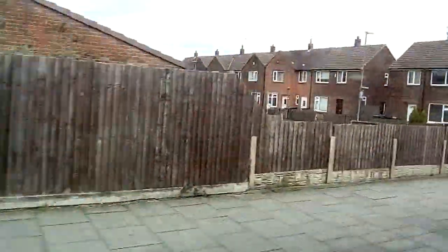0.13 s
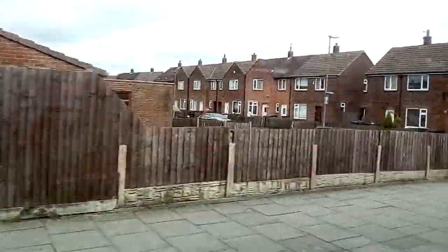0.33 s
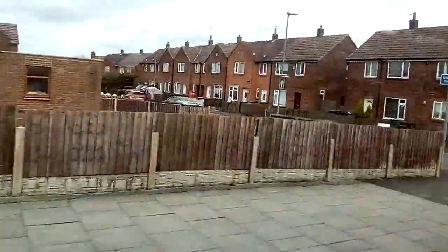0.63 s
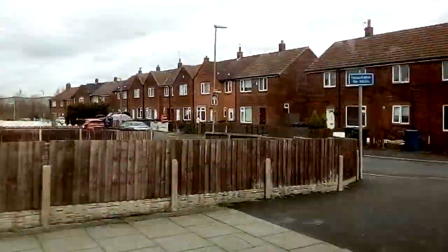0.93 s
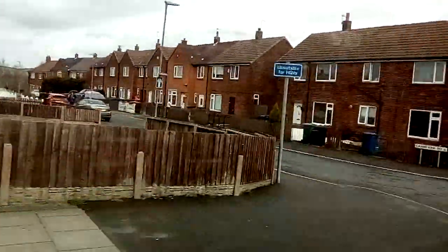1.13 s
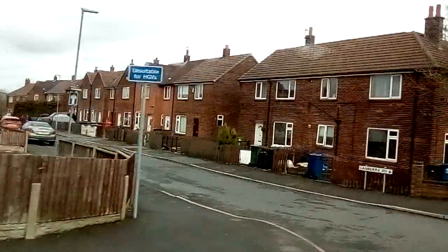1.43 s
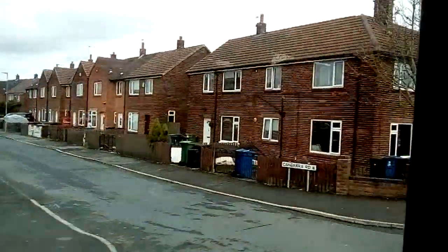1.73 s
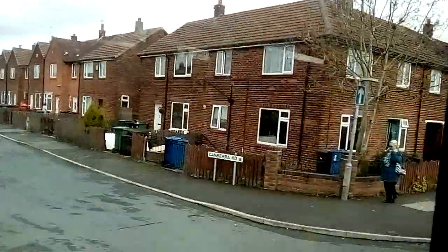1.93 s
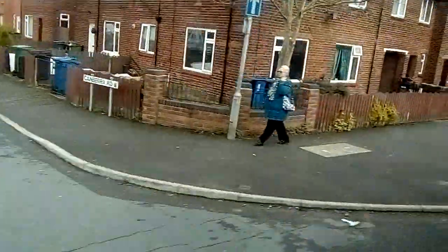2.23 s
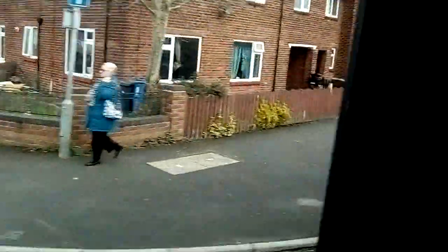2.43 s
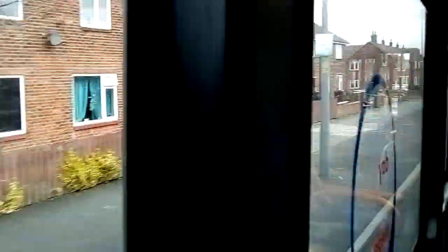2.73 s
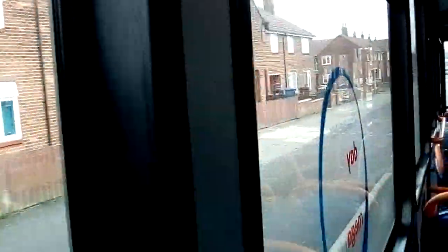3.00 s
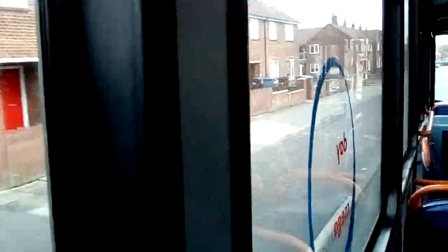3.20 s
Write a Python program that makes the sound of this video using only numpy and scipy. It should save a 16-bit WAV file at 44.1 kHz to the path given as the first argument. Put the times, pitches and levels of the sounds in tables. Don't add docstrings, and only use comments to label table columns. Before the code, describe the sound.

Bus engine drones low and booming inside the cabin while loose panels rattle over bumps

```python
import sys
import numpy as np
from scipy import signal
from scipy.fft import rfft, irfft, next_fast_len
from scipy.io import wavfile
from scipy.ndimage import uniform_filter1d

SR = 44100
rng = np.random.default_rng(int(sys.argv[2]) if len(sys.argv) > 2 else 0)


def boost(x):
    u = np.asarray(x, float) / 20
    return 10 ** u


def materialize(psi):
    bounded = np.clip(np.atleast_2d(psi).T, -1, 1)
    quanta = np.round(bounded * 32767).astype(np.int16)
    wavfile.write(sys.argv[1], SR, quanta)


N = 148176

# frequency in Hz, lead of the left port in radians.
PORT_LEAD = [(0, 0), (250, .3), (430, .6), (1120, 3.2), (2070, 7.0), (3620, 12.9), (5940, 22.6)]


def evened(x):
    return x / np.sqrt(np.mean(x ** 2) + 1e-20)


def read(points, hz):
    f, value = np.transpose(points)
    return np.interp(np.log(hz + 1), np.log(f + 1), value)


def colour(x, db_of):
    size = next_fast_len(N + 4096)
    gain = boost(db_of(np.fft.rfftfreq(size, 1 / SR)))
    return irfft(rfft(x, size) * gain, size)[..., :N]


def wander(rate_hz):
    return evened(colour(rng.standard_normal(N), lambda f: -40 * np.log10(1 + (f / rate_hz) ** 2)))


def resonate(x, hz, width_hz):
    turn = np.exp(2j * np.pi * np.cumsum(hz * np.ones(N)) / SR)
    r = np.exp(-np.pi * width_hz / SR)
    return 2 * (turn * signal.lfilter([1 - r], [1, -r], x / turn)).real


def engine():
    # time in seconds, sixth order in Hz, cabin boom in dB.
    boom = [(0.0, 256, -11.5), (0.069, 254.5, -17.5), (0.371, 251.5, -16.5), (0.471, 248.5, -23),
            (0.571, 254, -18), (0.772, 252.6, -21), (0.93, 252.5, -20), (1.199, 251.5, -19),
            (1.5, 250, -20), (1.702, 249, -25), (1.949, 248.5, -23), (2.198, 248, -24.5), (2.5, 247, -25.5),
            (2.75, 247, -28.5), (3.0, 245.6, -24.5), (3.15, 244, -25), (3.25, 242, -24), (3.36, 243, -25.5)]
    # time in seconds, level in dB.
    throb = [(0.0, -9), (0.07, -23), (0.5, -17.5), (0.55, -29.5), (0.76, -20), (0.95, -37.5), (1.0, -23),
             (1.28, -31.5), (1.33, -19.5), (1.41, -26), (2.98, -17.5), (3.13, -26), (3.18, -15.5),
             (3.36, -22)]
    # time in seconds, level in dB.
    shudder = [(0.0, -28.5), (0.27, -28), (0.39, -55.5), (0.47, -28.5), (0.94, -31.5), (0.97, -21),
               (1.1, -34), (1.19, -17.5), (1.23, -28.5), (1.82, -30), (1.93, -32), (2.2, -25), (2.3, -29),
               (2.52, -27), (3.03, -32.5), (3.36, -34.5)]
    # engine order, level in dB, share of the boom it follows.
    orders = [(1, -32, -.6), (2, -36, 0.1), (5, -42, .2), (8, -39, .6), (9, -45, -.3), (12, -45, .2)]
    throb_gain_db, shudder_gain_db = -2, 2.5
    waver_db, waver_hz, speed_drift = 1.5, 7.2, 0.00601

    s, hz, db = np.transpose(boom)
    t = np.arange(N) / SR
    swell_db = np.interp(t, s, db) - np.mean(db)
    throb_db = throb_gain_db + np.interp(t, *np.transpose(throb))
    shudder_db = shudder_gain_db + np.interp(t, *np.transpose(shudder))
    turns = np.cumsum(np.interp(t, s, hz) / 6 * (1 + speed_drift * wander(6))) / SR
    layers = [(6, np.mean(db), 1), (3, throb_db, 0), (4, shudder_db, 0), *orders]
    out = np.zeros((2, N))
    for order, level_db, share in layers:
        lead = np.interp(order * np.mean(hz) / 6, *np.transpose(PORT_LEAD)) * np.array([[.5], [-.5]])
        size = boost(level_db + share * swell_db + waver_db * wander(waver_hz))
        out += np.sqrt(2) * size * np.sin(2 * np.pi * (round(order) * turns + rng.random()) + lead)
    return out


def rattles():
    # start in seconds, strength in dB, chatter length in seconds, thud against crack in dB.
    bumps = [(0.0094, -30, 0.053, 2.5), (0.083, -42, 0.063, -30), (0.279, -32, 0.024, 6.5),
             (0.318, -35.5, 0.032, -0.5), (0.32, -33.5, 0.042, -7), (0.4324, -34, 0.05, 7),
             (0.47, -33.5, 0.047, 8.5), (0.515, -29.5, 0.12, 6), (0.572, -39.5, 0.11, 11.5),
             (0.7186, -31.5, 0.04, -2.5), (0.778, -31.5, 0.054, 2), (0.812, -26.5, 0.052, -13.5),
             (0.94, -28, 0.021, -11.5), (1.0274, -35, 0.061, -3.5), (1.075, -29, 0.056, 10.5),
             (1.103, -30.5, 0.02, 4), (1.134, -25.5, 0.057, -3), (1.193, -31, 0.096, 12.5),
             (1.206, -32, 0.065, 12.5), (1.249, -30, 0.12, 1.5), (1.314, -32.5, 0.21, -9.5),
             (1.3636, -29.5, 0.093, 4.5), (1.3705, -36, 0.062, -2), (1.4516, -25, 0.07, -4),
             (1.483, -43, 0.0089, -7), (1.512, -43, 0.019, 11.5), (1.569, -36.5, 0.019, 1.5),
             (1.819, -38.5, 0.17, -24), (1.908, -32, 0.022, 12.5), (2.143, -34, 0.048, 2.5),
             (2.254, -38.5, 0.036, 5), (2.353, -36.5, 0.011, 6), (2.7072, -25.5, 0.014, 4),
             (2.729, -31, 0.018, 4), (2.993, -38.5, 0.036, -5.5)]
    # frequency in Hz, width in Hz, level in dB.
    panels = [(410, 250, 15.5), (945, 230, 21), (1763, 460, 11.5), (2086, 68, -0.5), (2980, 350, -10),
              (3240, 190, -7)]
    # frequency in Hz, level in dB per Hz.
    crack_shape = [(150, 14.5), (380, 11.5), (1200, -5.5), (1700, -3.5), (3400, -8.5), (4200, -18),
                   (6800, -25), (8300, -49.5)]
    knocks_per_s, knock_spread_db, strike_db = 1800, 2, 9.5
    first_knock_db, first_knock_s = 1, .002
    thud_gain_db, ring_db, level_db, panel_drift = -2, -9, -1.5, 0.039

    t = np.arange(N) / SR
    present = rng.random(N) < knocks_per_s / SR
    sign = rng.choice([-1., 1.], N)
    knocks = evened(present * sign * boost(knock_spread_db * np.minimum(rng.exponential(1, N), 3)))
    power = np.zeros((2, N))
    for s, db, length_s, thud_db in bumps:
        u = (t - s) / max(length_s, .004)
        chatter = np.exp(-np.clip(u, 0, 9) ** 2)
        first = boost(first_knock_db) * np.exp(-abs(t - s) / first_knock_s)
        shake = boost(db) * (u > 0) * (chatter + first)
        power += (shake * boost(np.array([[min(thud_db, 6) + thud_gain_db], [0]]))) ** 2
        knocks[int(s * SR) + 1] = boost(strike_db)
    dull, bright = np.sqrt(power) * knocks
    lowpass = signal.butter(2, 1300, fs=SR, output="sos")
    drive = np.array([knocks, bright + signal.sosfiltfilt(lowpass, dull - bright)])
    crack = colour(drive, lambda f: read([*crack_shape, (16000, -69)], f))
    ring = 0
    for k, (f, width_hz, db) in enumerate(panels):
        hz = f * (1 + panel_drift * wander(5))
        tone = resonate(resonate(drive, hz, width_hz), hz, width_hz)
        ring = ring + (-1) ** k * boost(db) * tone / np.sqrt(width_hz)
    both = crack[1] / np.std(crack[0]) + boost(ring_db) * ring[1] / np.std(ring[0])
    return boost(level_db) * cabin(both)


def cabin(x):
    t60_s, tail_db = 0.066, 4
    t = np.arange(SR // 4) / SR
    tails = rng.standard_normal((3, 2, len(t))) * boost(-60 * t / t60_s)
    tails *= boost(tail_db) / np.linalg.norm(tails[0, 0])
    phase = np.arange(N) / SR * 7 + np.arange(3)[:, None] / 3
    place = np.sqrt(2 / 3) * np.cos(np.pi * phase)
    direct = np.array([x, np.roll(x, 20)])
    return direct + signal.fftconvolve((x * place)[:, None], tails, axes=2)[..., :N].sum(0)


def thumps():
    # start in seconds, frequency in Hz, level in dB.
    hits = [
        (0.45, 210.5, -28),
        (0.92, 330, -25.5),
        (1.1, 351, -30.5),
        (1.38, 310, -31.5),
        (2.03, 226.3, -30),
        (2.69, 397, -37),
    ]
    rise_s = .035
    t, out = np.arange(N) / SR, np.zeros(N)
    for s, hz, db in hits:
        u = np.clip((t - s) / rise_s, 0, 30)
        out += np.sqrt(2) * boost(db) * u * np.exp(1 - u) * np.sin(2 * np.pi * hz * t)
    return np.array([out, np.roll(out, 10)])


def squeaks():
    # start in seconds, length in seconds, joint index, level in dB.
    rubs = [
        (1.47, .16, 0, -62),
        (1.72, .09, 0, -57),
        (1.81, .055, 0, -55),
        (1.865, .055, 0, -54),
        (1.925, .055, 0, -55),
        (2.0, .22, 0, -62),
        (1.83, .22, 1, -61),
        (2.25, .24, 1, -56),
        (2.54, .12, 1, -53),
        (2.88, .2, 2, -62),
    ]
    joints_hz = (3597, 2965, 3284)
    pitch_drift, waver_db, level_db = .0012, 1.2, 3
    t, out = np.arange(N) / SR, np.zeros(N)
    turns = np.cumsum(1 + pitch_drift * wander(20.7)) / SR
    for s, length_s, joint, db in rubs:
        swell = np.minimum(3 * np.sin(np.pi * np.clip((t - s) / length_s, 0, 1)), 1)
        out += boost(db) * np.sin(2 * np.pi * joints_hz[round(joint)] * turns) * swell
    out *= np.sqrt(2) * boost(level_db + waver_db * wander(28))
    return np.array([out, np.roll(out, 9)])


def trim():
    # start in seconds, strength in dB, length in seconds.
    fizzes = [(0.324, -49.5, .016), (0.542, -55, 0.035), (0.722, -52.5, 0.028), (0.787, -51, 0.036),
              (0.829, -51, 0.027), (0.943, -57, .016), (1.083, -49, 0.012), (1.105, -53.5, .02),
              (1.137, -50, 0.059), (1.223, -53.5, 0.065), (1.382, -56, 0.061), (1.481, -50.5, 0.044),
              (1.58, -52.5, .016), (1.739, -56, 0.04), (1.909, -50, .012), (2.7065, -48.5, 0.037)]
    # frequency in Hz, level in dB per Hz.
    fizz_shape = [(3000, -11), (4500, 17), (6800, 12.5), (8200, 0.5), (12500, -5.5), (13900, -21),
                  (14700, 1.5), (15600, -6.5)]
    # time in seconds, level in dB.
    tick_events = [(0.0513, -64), (0.1316, -72), (0.1705, -64), (0.2518, -63), (0.4115, -72), (0.471, -73),
                   (0.5524, -59), (1.1108, -58), (1.6916, -76), (1.7903, -62), (2.0713, -62), (2.2935, -78),
                   (2.8703, -61), (3.1926, -73), (3.272, -65)]
    tick_hz, tick_s, tick_db = 12000, .0012, 1
    t, shake, ticks = np.arange(N) / SR, np.zeros(N), np.zeros(N)
    for s, db, length_s in fizzes:
        shake += boost(db) * (t > s) * np.exp(-((t - s) / length_s) ** 2)
    for s, db in tick_events:
        pulse = np.exp(-((t - s - tick_s) / tick_s) ** 2)
        ticks += boost(db + tick_db) * pulse * np.sin(2 * np.pi * tick_hz * t)
    a, b = evened(colour(rng.standard_normal((2, N)), lambda f: read(fizz_shape, f)))
    return uniform_filter1d(shake, size=40) * np.array([a + 0.44 * b, a - .6 * b]) + ticks


def road():
    # time in seconds, roughness in dB.
    roughness = [(0.0, -23.5), (0.21, -24), (0.319, -25), (0.43, -17.5), (0.54, -23), (0.902, -20),
                 (2.01, -21.5), (2.551, -24), (3.309, -22.5), (3.36, -33)]
    # frequency in Hz, level in dB per Hz.
    rumble_shape = [(15, 0), (35, -25), (72, 3), (100, 13), (130, 4.5), (200, 2.5), (330, -7), (600, -37.5)]
    roar_shape = [(150, -39.5), (350, -2), (850, -5.5), (1200, -14.5), (3300, -26), (3900, -33),
                  (6800, -37.5), (8000, -57)]
    rumble_db, roar_db, roar_follows, gust_db = -20.5, -33, 0.23, .7
    s, db = np.transpose(roughness)
    rough_db = np.interp(np.arange(N) / SR, s, db - np.mean(db))
    rumble = boost(rumble_db + rough_db) * wash([*rumble_shape, (1500, -110)], patchy_db=.4)
    roar_gain = boost(roar_db + roar_follows * rough_db + gust_db * wander(12))
    roar = roar_gain * wash([(50, -70), *roar_shape, (9000, -100)], patchy_db=1.2)
    return rumble + roar


def wash(shape, patchy_db):
    # frequency in Hz, likeness of the two ports from 0 to 1.
    likeness = [(30, 0.86), (60, 0.98), (250, 0.94), (450, 0.91), (900, 0.18), (2000, 0.18), (5000, 0.13)]
    frames, hz = N // 256 + 5, np.fft.rfftfreq(1024, 1 / SR)
    a, b, c, d, patches = rng.standard_normal((frames, 513, 5)).T
    patches = uniform_filter1d(patches, size=8, axis=0)
    patches = evened(uniform_filter1d(patches, size=12, axis=1))
    same = np.clip(read(likeness, hz), 0, 1)[:, None]
    left, other = a + 1j * b, c + 1j * d
    lag = np.exp(-1j * np.interp(hz, *np.transpose(PORT_LEAD)))[:, None]
    z = np.array([left, lag * (same * left + np.sqrt(1 - same ** 2) * other)])
    z *= boost(read(shape, hz)[:, None] + patchy_db * patches)
    return evened(signal.istft(z, nperseg=1024, noverlap=768)[1][:, :N])


def circuit_hiss():
    # frequency in Hz, level in dB per Hz.
    hiss_shape = [(6000, -20), (8000, 0), (10500, -1), (12500, -3), (14000, -10), (14700, 5), (15600, 4)]
    level_db = -73
    a, b = evened(colour(rng.standard_normal((2, N)), lambda f: read(hiss_shape, f)))
    return boost(level_db + .8 * wander(6)) * np.array([a + .7 * b, a - .7 * b])


def scene():
    return engine() + rattles() + thumps() + squeaks() + road()


def roll_off(x):
    return signal.sosfilt(signal.butter(12, 15700, fs=SR, output="sos"), x)


def record(dry):
    # frequency in Hz, gain in dB.
    mic = [(20, -5), (60, 0), (7000, 0), (8300, -12)]
    # frequency in Hz, left minus right in dB.
    tilt = [(30, -.3), (100, -1.4), (500, -1.6), (850, -2.6), (1440, 2.5), (2440, 9.0), (4140, 8.0),
            (7020, 7.5), (9000, .5)]
    ceiling = .68
    ports = colour(dry, lambda f: read(mic, f) + read(tilt, f) * np.array([[.5], [-.5]])) + trim()
    soft = ceiling * np.tanh((ports + circuit_hiss()) / ceiling)
    return roll_off(soft)


dry = scene()
out = record(dry)
materialize(out)
```